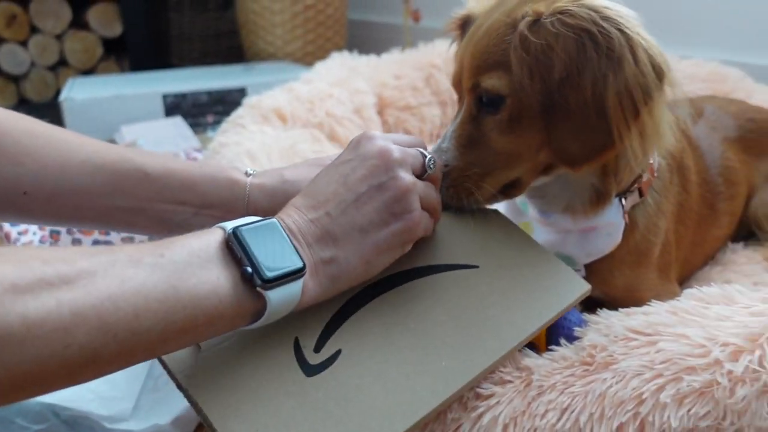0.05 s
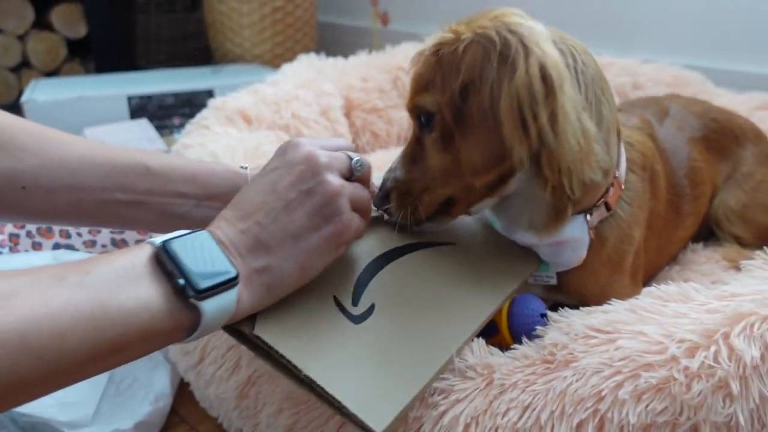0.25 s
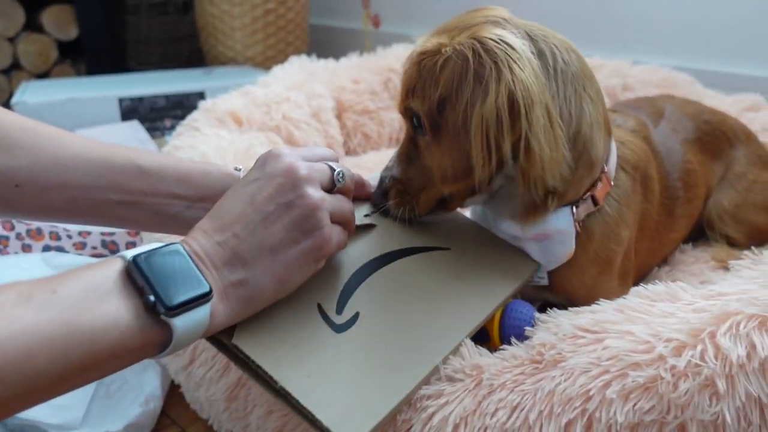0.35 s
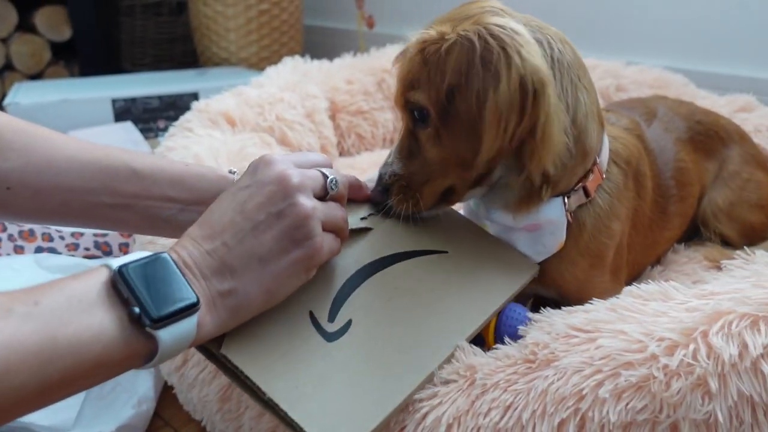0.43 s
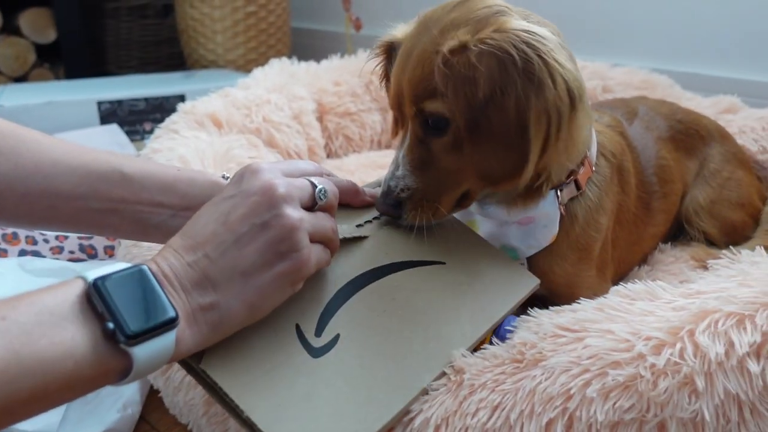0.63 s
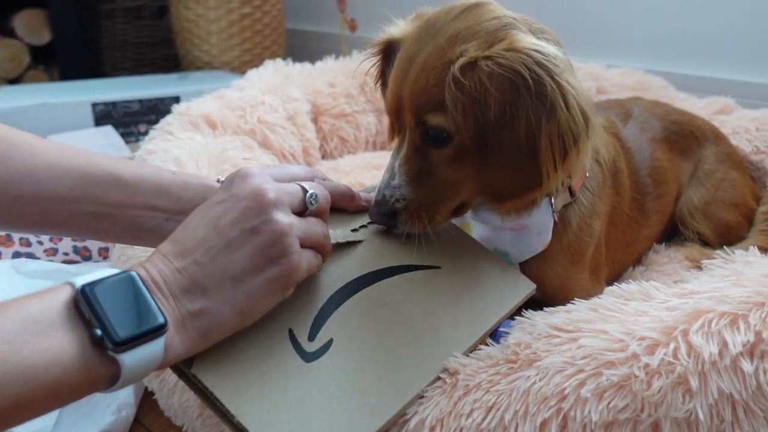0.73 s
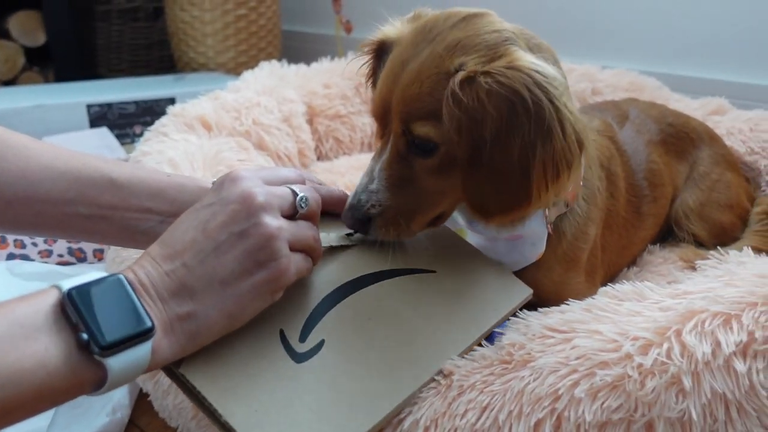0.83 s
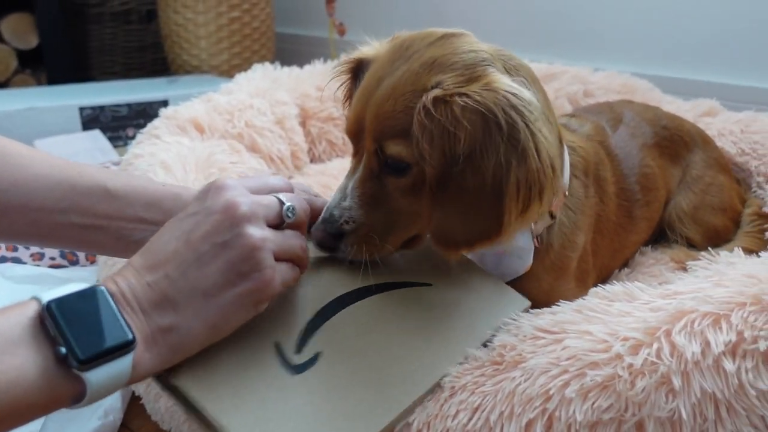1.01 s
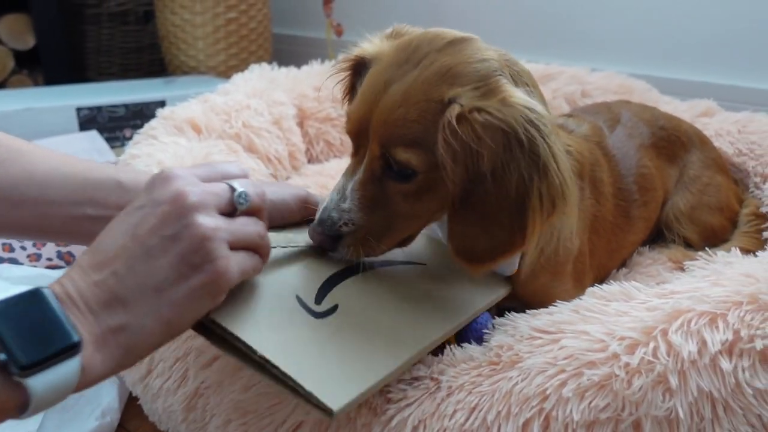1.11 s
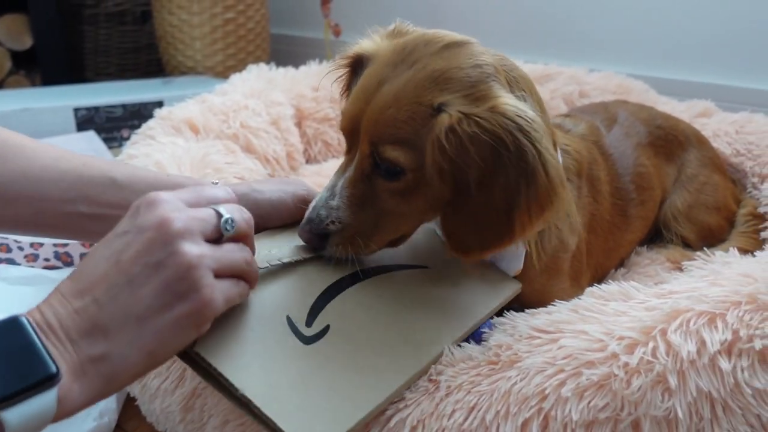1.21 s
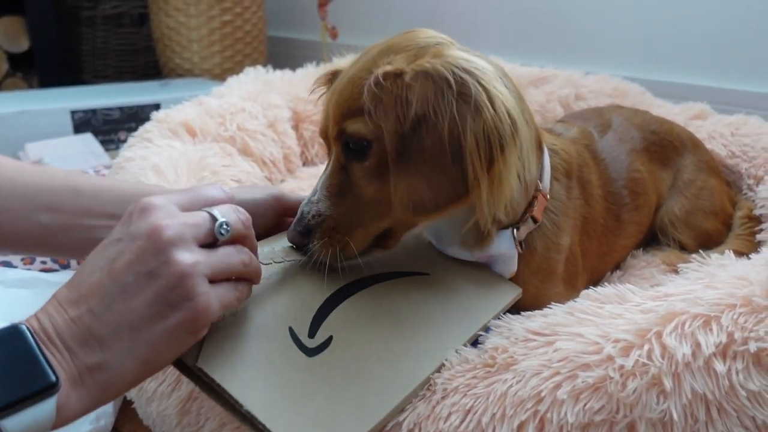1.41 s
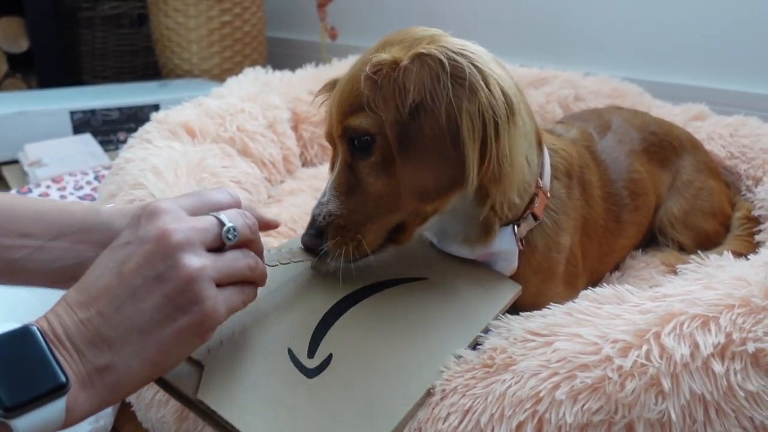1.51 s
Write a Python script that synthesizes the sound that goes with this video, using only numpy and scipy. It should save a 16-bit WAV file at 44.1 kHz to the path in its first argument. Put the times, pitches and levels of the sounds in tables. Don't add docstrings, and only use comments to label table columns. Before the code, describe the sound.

Cardboard tearing: two short sharp rips along perforations, then a duller third beginning, close indoors

```python
import sys
import numpy as np
from scipy import signal
from scipy.io import wavfile

SR = 44100
rng = np.random.default_rng(int(sys.argv[2]) if len(sys.argv) > 2 else 0)


def output_pcm(signal):
    pcm = np.clip(np.atleast_2d(signal).T, -1, 1) * 32767
    wavfile.write(sys.argv[1], SR, np.round(pcm).astype(np.int16))


def gain_from_db(level_db):
    decades = np.asarray(level_db, float) / 20
    return 10 ** decades


N = 68355


def evened(x):
    return x / np.sqrt(np.mean(x ** 2) + 1e-20)


def read(points, hz):
    f, value = np.transpose(points)
    return np.interp(np.log(hz + 1), np.log(f + 1), value)


def curve(rows, column):
    rows = np.array(rows)
    return gain_from_db(np.interp(np.arange(N) / SR, rows[:, 0], rows[:, column], left=-120, right=-120))


def colour(x, points):
    level_db = read(points, abs(np.fft.fftfreq(4096, 1 / SR)))
    log_gain = np.log(gain_from_db(np.maximum(level_db, -100)))
    taps = np.fft.ifft(np.exp(np.conj(signal.hilbert(log_gain)))).real[:2048]
    return signal.fftconvolve(x, taps)[:len(x)]


def resonate(x, hz, width_hz):
    b, a = signal.iirpeak(min(hz, 18000), hz / width_hz, SR)
    return signal.lfilter(b, a, x)


def resonate_twice(x, hz, width_hz):
    return resonate(resonate(x, hz, width_hz), hz, 2 * width_hz)


def resonances(x, modes):
    return evened(sum(gain_from_db(db) * resonate(x, hz, width_hz) for hz, width_hz, db in modes))


def crackle(per_s, spread_db, smooth):
    happens = rng.random(N) < per_s / SR
    size = gain_from_db(spread_db * np.minimum(rng.exponential(1, N), 4))
    snaps = happens * size * rng.standard_normal(N)
    return smooth * rng.standard_normal(N) + evened(snaps) * np.sqrt(1 - smooth ** 2)


def grains(per_s, spread_db, smooth):
    bands_hz = np.arange(700, 16000, 1300)
    return sum(evened(resonate(crackle(per_s, spread_db, smooth), hz, 2200)) for hz in bands_hz)


def add(mix, s, sound):
    part = mix[round(s * SR):][:len(sound)]
    part += sound[:len(part)]


# f/Hz, level/dB
HISS_SPECTRUM = [(18, -78), (30, -15), (100, -10), (468, -10), (641, 3), (833, -21), (975, -2),
                 (8120, -27.5), (15600, -25)]
HISS_DB = -66
HUM_HZ, HUM_WIDTH_HZ, HUM_DB = 665, 118, -69.5


def air():
    hiss = [evened(colour(rng.standard_normal(N), HISS_SPECTRUM)) for _ in range(2)]
    hum = [evened(resonate_twice(rng.standard_normal(N), HUM_HZ, HUM_WIDTH_HZ)) for _ in range(2)]
    mid = gain_from_db(HISS_DB) * hiss[0] + gain_from_db(HUM_DB) * hum[0]
    side = gain_from_db(HISS_DB + 3) * hiss[1] + gain_from_db(HUM_DB + 3.5) * (hum[1] - 0.22 * hum[0])
    return np.array([mid + side, mid - side])


# t/s, level/dB
HANDS = [(0, -58.5), (.1, -61), (.13, -65.5), (.18, -60.5), (.3, -38), (.55, -65), (.7, -68), (.93, -68),
         (.96, -62.5), (1.06, -55), (1.3, -63), (1.4, -54), (1.485, -57), (1.55, -58)]
# f/Hz, level/dB
RUSTLE = [(880, -34), (1500, -14), (1740, -6.5), (4500, -4), (9660, -5), (12500, -16), (15600, -28)]
# t/s, level/dB
PALM = [
    (0, -58),
    (.03, -60),
    (.17, -60.5),
    (.25, -75),
]
# f/Hz, width/Hz, level/dB
RUB = [(480, 120, -3), (700, 200, -1), (1020, 200, 0), (1320, 300, 0), (1640, 130, 6)]
# t/s, level/dB
GRIP = [
    (1.38, -70),
    (1.4, -66),
    (1.45, -58),
    (1.485, -56.5),
    (1.51, -52),
    (1.53, -72),
]
GRIP_HZ, GRIP_WIDTH_HZ = 4300, 2500


def hands():
    rustle = evened(colour(grains(280, 4.4, 0.92), RUSTLE))
    low_pass = signal.butter(8, 1740, fs=SR, output="sos")
    skin = signal.sosfilt(low_pass, crackle(900, 2.0, 0.9))
    rub = resonances(skin, RUB)
    grip = evened(resonate_twice(rustle, GRIP_HZ, GRIP_WIDTH_HZ))
    return curve(GRIP, column=1) * grip + curve(HANDS, column=1) * rustle + curve(PALM, column=1) * rub


def snap(drive, board_db, board_hz, edge_db, edge_hz, board_q, edge_q, wide):
    drive = signal.lfilter(*signal.butter(4, 12900, fs=SR), drive)
    board = resonate_twice(drive, board_hz, board_hz / board_q)
    board = resonate(resonate(drive, board_hz, board_hz / board_q), board_hz, 2 * board_hz)
    edge = resonate(resonate(drive, edge_hz, edge_hz / edge_q), edge_hz, edge_hz)
    edge = edge + wide * resonate(drive, edge_hz, 0.64 * edge_hz)
    return gain_from_db(board_db) * board / abs(board).max() - gain_from_db(edge_db) * edge / abs(edge).max()


# t/s, board ring level/dB, board ring f/Hz, torn edge level/dB, torn edge f/Hz
TICKS = [(0.028, -53, 3000, -46, 8500), (.1008, -64, 3000, -42, 9500), (.147, -66, 2900, -49, 6440),
         (.0502, -51, 2450, -43.5, 5800), (.062, -49, 2500, -41.5, 7900), (.079, -63, 3100, -39.5, 6600),
         (0.0847, -75, 3400, -31.5, 7970), (0.2937, -14.5, 2200, -24, 8150),
         (0.2987, -10.5, 2090, -34, 3500), (0.3011, -22, 2420, -13.5, 8200), (.334, -28, 2240, -25.5, 5900),
         (0.5047, -43, 2330, -51, 6100), (0.526, -66, 2200, -45.5, 6050), (.577, -51, 2600, -60, 6000),
         (.5835, -36.5, 2460, -45, 9000), (.638, -38.5, 2580, -42, 8600), (.654, -62, 2500, -47, 7500),
         (0.6988, -55.5, 1900, -55, 7040), (.741, -47, 2160, -43, 8140), (.7605, -51, 2000, -47, 5130),
         (0.8103, -62, 2500, -51, 7570), (.827, -66, 2500, -54, 9500), (0.884, -55.5, 2530, -46.5, 7840),
         (0.951, -43, 1940, -38, 5800), (.992, -70, 2500, -44, 7550), (1.013, -61, 2500, -42, 8100),
         (1.035, -47.5, 2190, -38, 5650), (1.0557, -44, 2500, -37, 5900), (1.375, -39, 2800, -42, 5300),
         (1.3758, -26.5, 2880, -26.5, 5800), (1.3755, -35, 1300, -32, 8300),
         (1.392, -35.5, 2840, -35, 4940)]
ECHO_S, ECHO_DB = 0.005, -18.5


def ticks():
    out, t = np.zeros(N), np.arange(500) / SR
    for (s, *rings), noise in zip(TICKS, rng.standard_normal((len(TICKS), 500))):
        click = (t == 0) + 0.32 * noise * np.exp(-t / 0.0014)
        echo = noise[::-1] * (t > ECHO_S) * np.exp(-abs(t - ECHO_S) / 0.0007)
        add(out, s, snap(click + gain_from_db(ECHO_DB) * echo, *rings, board_q=1.9, edge_q=4.7, wide=0.3))
    return out


# t/s, tearing level/dB, panel flex level/dB
PULL_ONE = [
    (.178, -100, -74),
    (.188, -44.5, -62),
    (.21, -42.5, -61),
    (.23, -31, -33.5),
    (.26, -29, -44.5),
    (.3, -27.5, -38),
    (.315, -64, -45),
    (.345, -54, -61),
    (.4, -78, -74),
]
# t/s, tearing level/dB, panel flex level/dB
PULL_TWO = [
    (1.066, -66, -90),
    (1.08, -34.5, -81),
    (1.099, -37.5, -56.5),
    (1.117, -27, -59),
    (1.136, -32.5, -43.5),
    (1.166, -31.5, -49),
    (1.211, -40.5, -55),
    (1.28, -48, -61),
    (1.339, -55.5, -71),
]
# t/s, tearing level/dB
PULL_THREE = [
    (1.45, -59),
    (1.49, -54.5),
    (1.492, -51),
    (1.512, -42.5),
    (1.521, -43),
    (1.532, -46),
    (1.55, -41),
]
# t/s, level/dB
FRAY = [
    (.3, -75),
    (.34, -62),
    (.4, -57.5),
    (.46, -52),
    (.52, -84),
]
FRAY_HZ, FRAY_WIDTH_HZ = 7430, 1200
# f/Hz, level/dB
TEAR = [(240, -23), (600, -11.5), (1260, -2), (3070, -1.5), (3370, -6.5), (3700, -4), (6620, -4),
        (11700, -14), (15600, -22.5)]
# f/Hz, width/Hz, level/dB
PANEL = [(95, 50, -24), (137.6, 39, 1.5), (198, 33, 3), (289, 69, 3.5), (396, 180, 3), (610, 46, -24)]


def tearing():
    fibres = evened(colour(grains(900, 1.73, 0.61), TEAR))
    flex = resonances(crackle(600, 5.1, 0.6), PANEL)
    slow = resonate(resonate(fibres, 3150, 2800), 3100, 2700)
    slow = slow + resonate(fibres, 750, 960) + 1.9 * resonate(fibres, 540, 370)
    slow = evened(slow + 0.89 * resonate(fibres, 1970, 620) + 0.038 * flex)
    slow = signal.lfilter(*signal.butter(3, 5000, fs=SR), slow)
    fray = evened(resonate_twice(fibres, FRAY_HZ, FRAY_WIDTH_HZ))
    out = curve(FRAY, column=1) * fray + curve(PULL_THREE, column=1) * slow
    for pull in (PULL_ONE, PULL_TWO):
        out = out + curve(pull, column=1) * fibres + curve(pull, column=2) * flex
    return out


# t/s, board ring level/dB, board ring f/Hz, torn edge level/dB, torn edge f/Hz
RIP_ONE = [(.179, -66, 1700, -43, 6650), (0.185, -63, 1490, -43, 7000), (0.1885, -47, 1380, -31.5, 6800),
           (.194, -36, 1370, -29, 6500), (0.197, -27.5, 1170, -25.5, 6670),
           (0.2028, -24.5, 1670, -14, 6560), (0.2046, -24, 2070, -22, 6540), (.21, -60, 1520, -37, 4600),
           (.215, -51, 1290, -26, 6800), (.2195, -29, 1240, -31, 4050), (.2243, -18.5, 900, -25, 3700),
           (0.2333, -17.5, 1410, -14.5, 3700), (0.236, -16.5, 1050, -12.5, 5270),
           (.238, -24, 1600, -24, 4200), (.2415, -39, 1780, -31, 4200), (.2525, -37, 2100, -28, 7200),
           (0.2565, -16, 2600, -22, 7000), (0.2607, -12.5, 2020, -20, 6400), (.265, -16, 3150, -13.5, 5100),
           (.2668, -16.5, 3400, -11, 5960), (0.2805, -23, 2820, -24, 7900), (0.29, -24.5, 2270, -34, 5000),
           (.296, -22, 2300, -30, 4970), (.3025, -25, 740, -34, 6050), (.328, -30, 1720, -29, 4000),
           (0.336, -31, 2100, -36, 6500), (.3425, -32, 2110, -33, 6530)]
# t/s, board ring level/dB, board ring f/Hz, torn edge level/dB, torn edge f/Hz
LATER_RIPS = [(1.077, -37.5, 713, -30.5, 6000), (1.0812, -23, 2400, -21, 6000),
              (1.0839, -19, 2150, -15.5, 6200), (1.0848, -22, 2920, -16.5, 8700),
              (1.094, -36, 1820, -25, 5960), (1.1059, -34, 1820, -23, 6500),
              (1.1155, -17.5, 1900, -20, 5500), (1.1174, -20, 2260, -14.5, 4450),
              (1.11, -30, 1320, -40, 6000), (1.134, -34, 1190, -22, 6400), (1.1431, -22, 1930, -23, 4570),
              (1.1465, -18, 1860, -12.5, 4670), (1.1478, -19.5, 2200, -14, 7800),
              (1.154, -27, 1900, -24, 4600), (1.162, -28, 1490, -22, 8050), (1.1775, -31, 1880, -23, 5000),
              (1.13, -31.5, 301, -50, 4500), (1.441, -49.5, 690, -70, 3000), (1.453, -51, 680, -43, 3250),
              (1.4925, -42, 3100, -40, 4500), (1.5028, -44, 3200, -40, 4300), (1.508, -37, 1980, -37, 4340),
              (1.516, -35, 2180, -36, 3760), (1.5188, -34, 1190, -28.5, 3260),
              (1.523, -37, 1140, -30.5, 2900), (1.544, -43, 1900, -31.5, 3030)]
BURST_RISE_S, BURST_S, BURST_SNAPS_PER_S = 0.0015, 0.0016, 3500


def bridges():
    out, t = np.zeros(N), np.arange(900) / SR
    bursts = RIP_ONE + LATER_RIPS
    width_s = np.where(t < BURST_RISE_S, 0.5 * BURST_RISE_S, BURST_S)
    swell = np.exp(-((t - BURST_RISE_S) / width_s) ** 2)
    for (s, *rings), (odds, size) in zip(bursts, rng.random((len(bursts), 2, 900))):
        snaps = (odds < BURST_SNAPS_PER_S / SR) + 0.5
        drive = snaps * (2 * size - 1) * swell
        add(out, s - 0.5 * BURST_RISE_S, snap(drive, *rings, board_q=3.37, edge_q=5.8, wide=0.56))
    return out


# f/Hz, t/s
ROOM = [(100, 0.51), (700, 0.44), (1500, 0.46), (2400, 0.42), (4000, 0.45), (9000, 0.21), (15000, 0.53)]


def room(x):
    taps = np.zeros((2, SR))
    at = np.arange(150, SR - 20, 20) + rng.integers(0, 20, (2, (SR - 151) // 20))
    np.put_along_axis(taps, at, rng.choice([-1., 1.], at.shape), 1)
    hz, t, bands = signal.stft(taps, SR, nperseg=256)
    fade = gain_from_db(-60 * t / read(ROOM, hz)[:, None])
    tail = signal.istft(bands * fade, SR, nperseg=256)[1]
    return signal.fftconvolve(x[None], tail / np.linalg.norm(tail[0]), axes=1)[:, :N]


def scatter(x):
    i = np.arange(900)
    taps = rng.standard_normal(900) * np.exp(-i / 240.0) * (i > 30)
    return signal.fftconvolve(x, taps / np.linalg.norm(taps))[:N]


# f/Hz, level/dB
SIDE_TILT = [(100, -38), (500, -17.5), (1000, -19.5), (3000, -13), (6000, -10), (12000, -8)]
ROOM_DB = -9
LEAN = 0.15


def scene():
    board = hands() + ticks() + tearing() + bridges()
    wet_mid, wet_side = gain_from_db(ROOM_DB) * room(board)
    mid = board + wet_mid
    side = colour(scatter(board) + gain_from_db(6.5) * wet_side, SIDE_TILT)
    side = side + LEAN * resonate(mid, 15000, 9000)
    return np.array([mid + side, mid - side]) + air()


def top_cut(x):
    return signal.sosfilt(signal.butter(12, 15770, fs=SR, output="sos"), x)


def record(dry):
    thin = signal.sosfilt(signal.butter(2, 90, "high", fs=SR, output="sos"), dry)
    low_pass = signal.firwin(511, 15800, window=("kaiser", 9), fs=SR)
    cut = signal.oaconvolve(thin, low_pass[None], "same")
    return top_cut(cut)


dry = scene()
out = record(dry)
output_pcm(out)
```